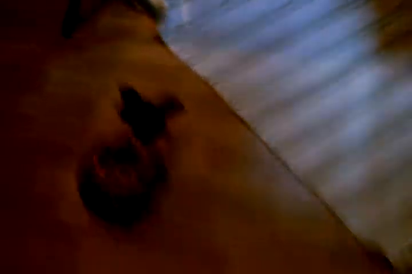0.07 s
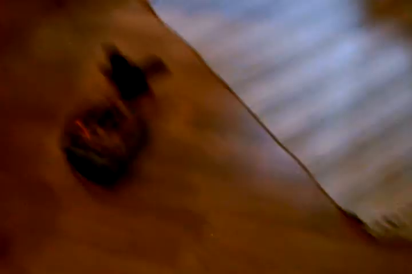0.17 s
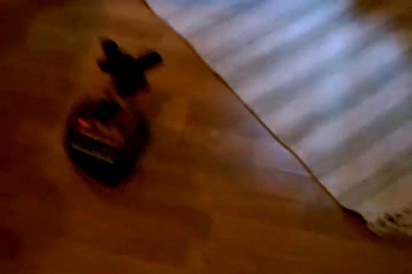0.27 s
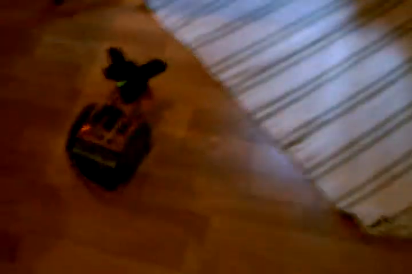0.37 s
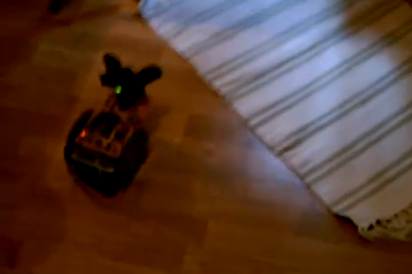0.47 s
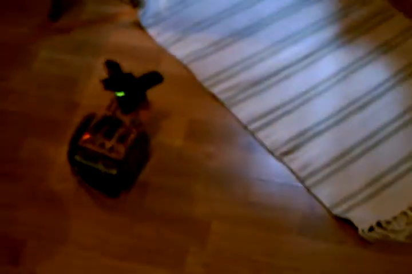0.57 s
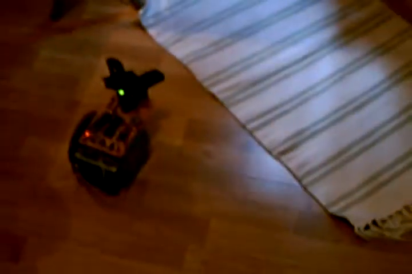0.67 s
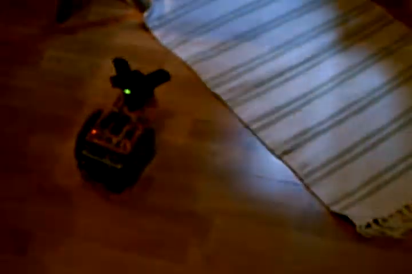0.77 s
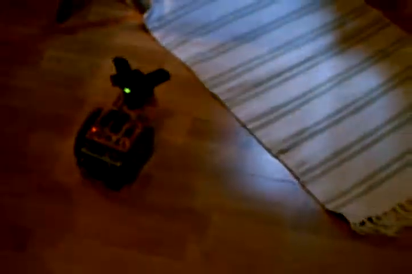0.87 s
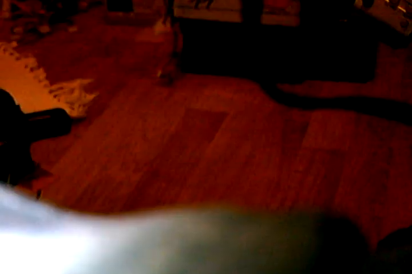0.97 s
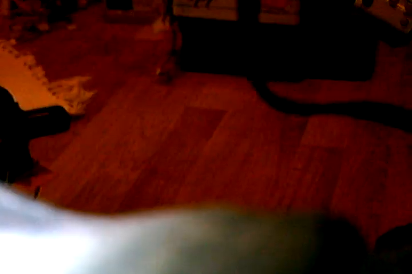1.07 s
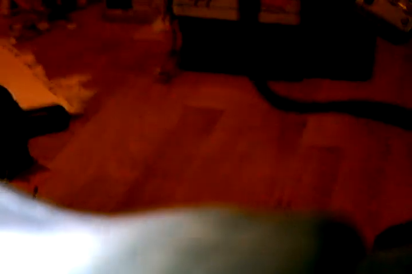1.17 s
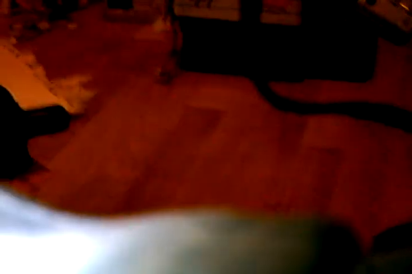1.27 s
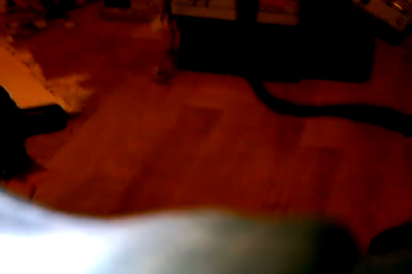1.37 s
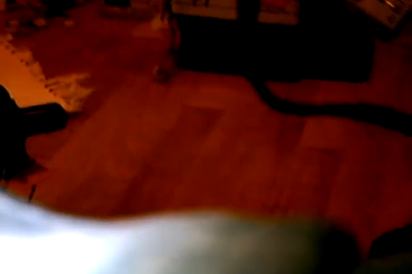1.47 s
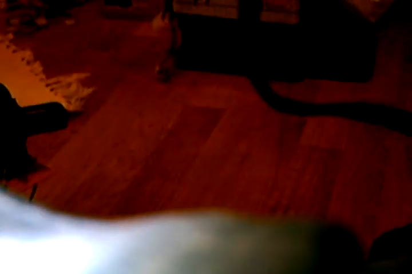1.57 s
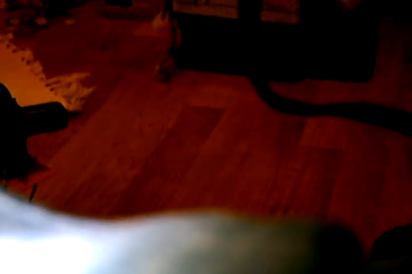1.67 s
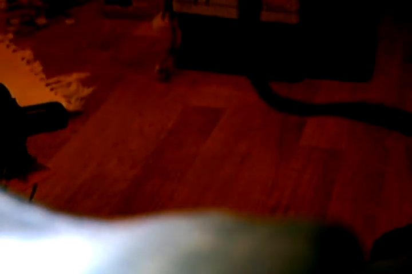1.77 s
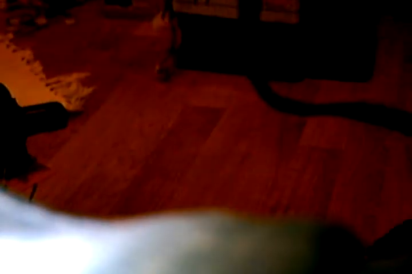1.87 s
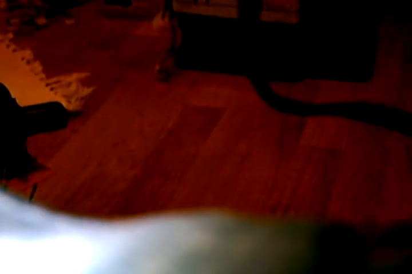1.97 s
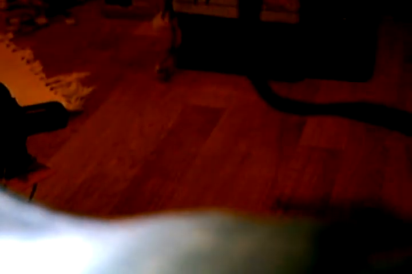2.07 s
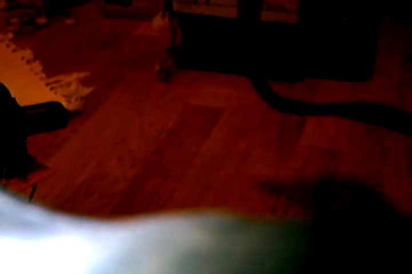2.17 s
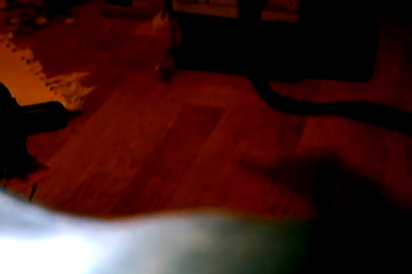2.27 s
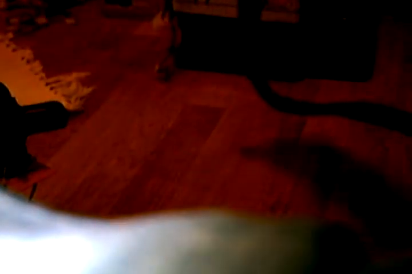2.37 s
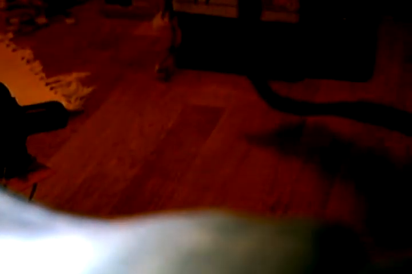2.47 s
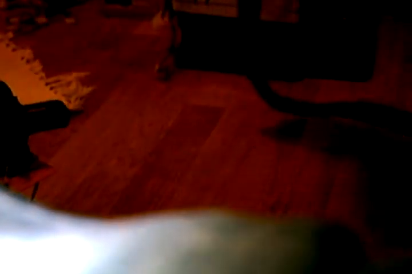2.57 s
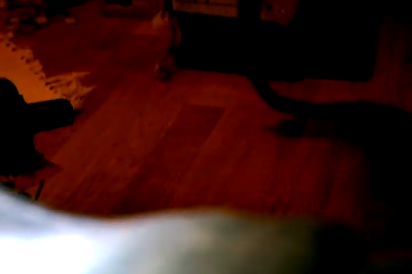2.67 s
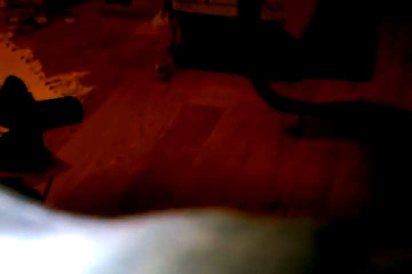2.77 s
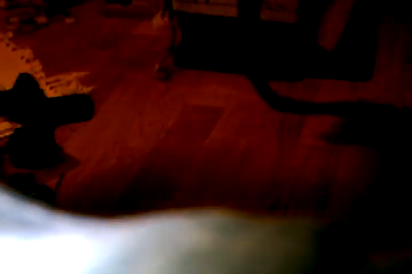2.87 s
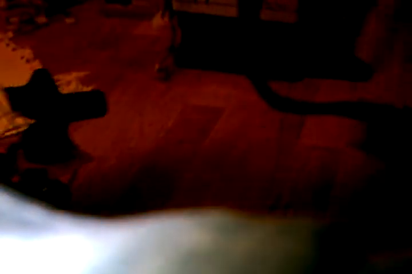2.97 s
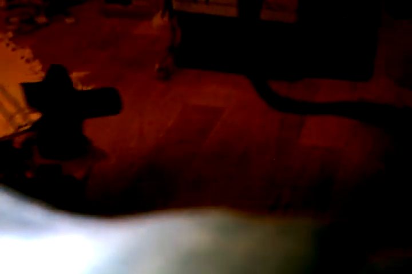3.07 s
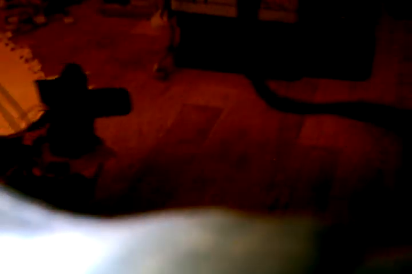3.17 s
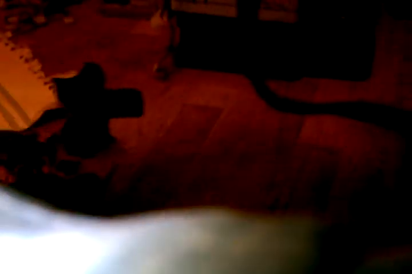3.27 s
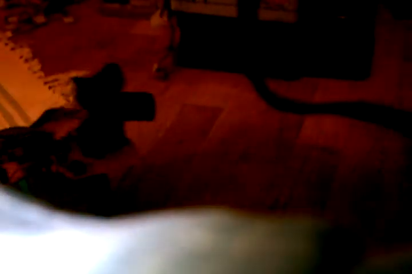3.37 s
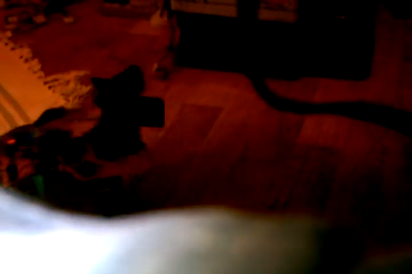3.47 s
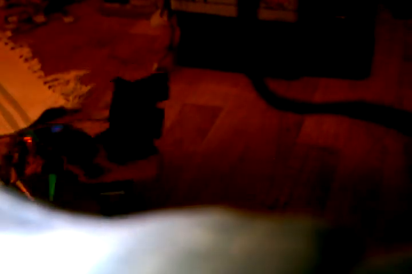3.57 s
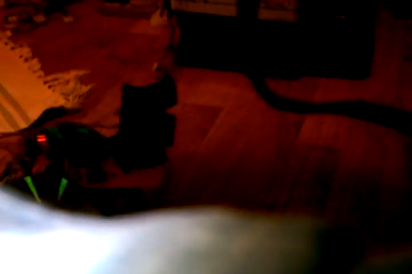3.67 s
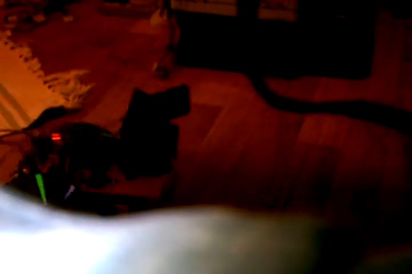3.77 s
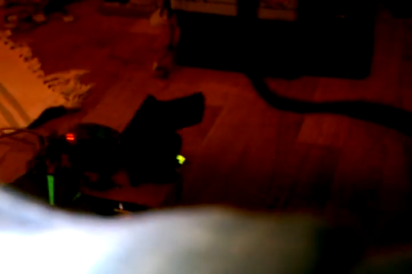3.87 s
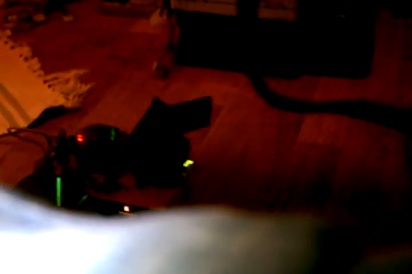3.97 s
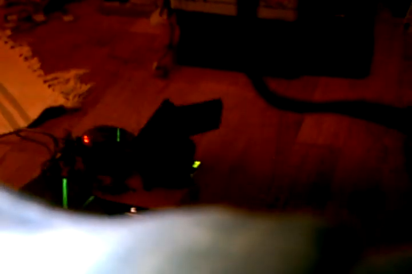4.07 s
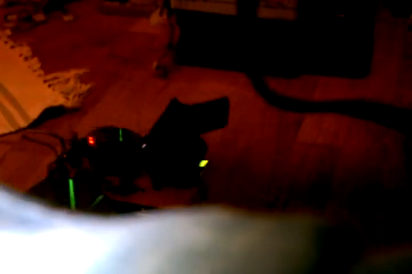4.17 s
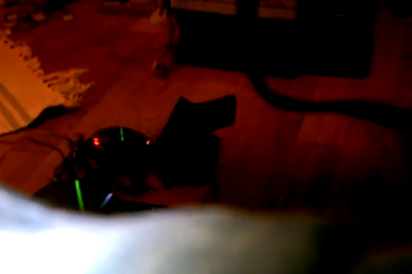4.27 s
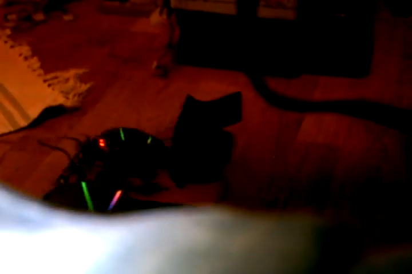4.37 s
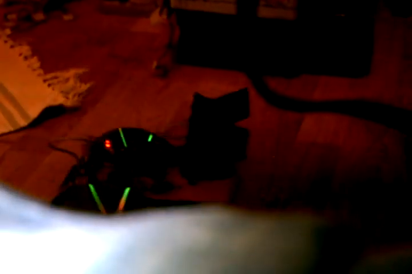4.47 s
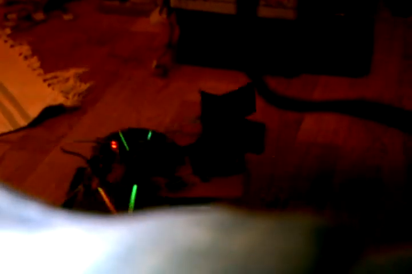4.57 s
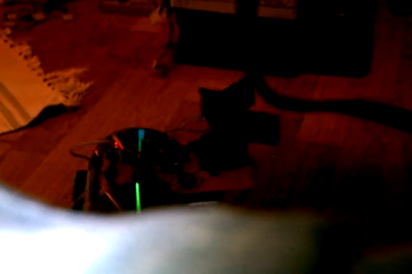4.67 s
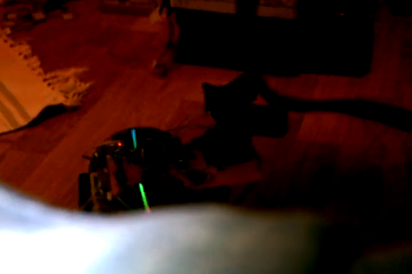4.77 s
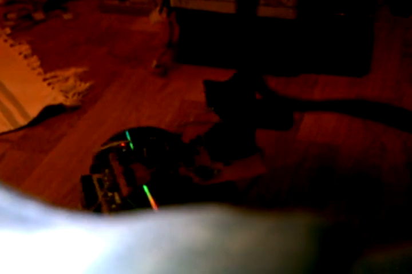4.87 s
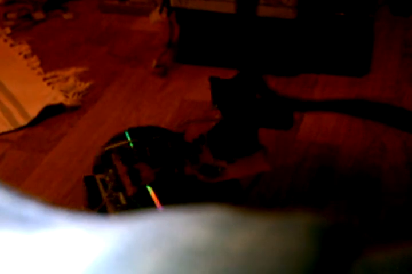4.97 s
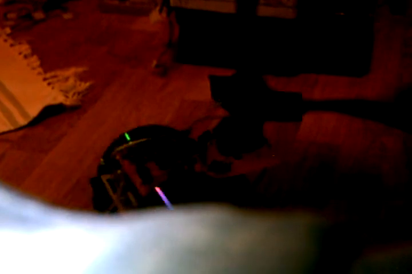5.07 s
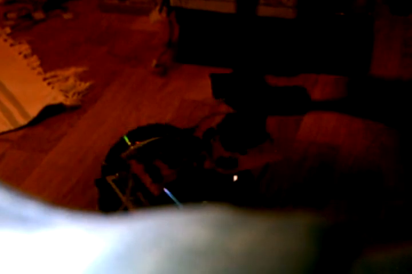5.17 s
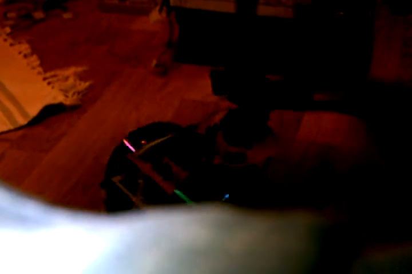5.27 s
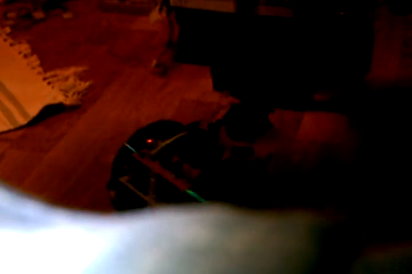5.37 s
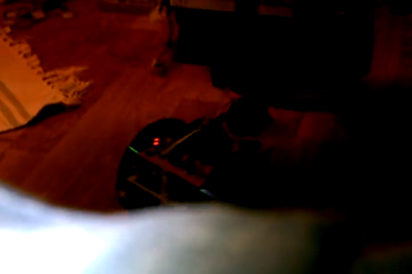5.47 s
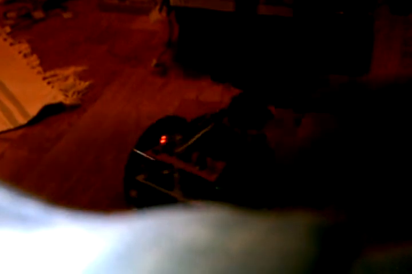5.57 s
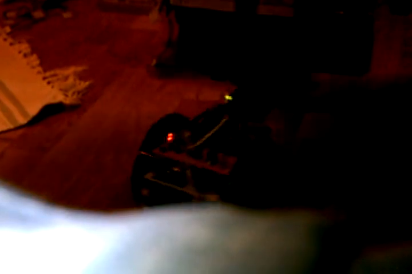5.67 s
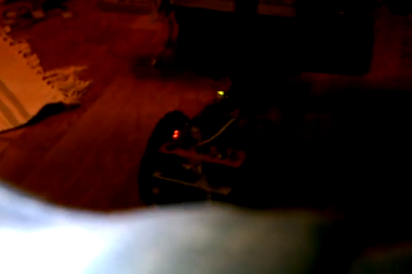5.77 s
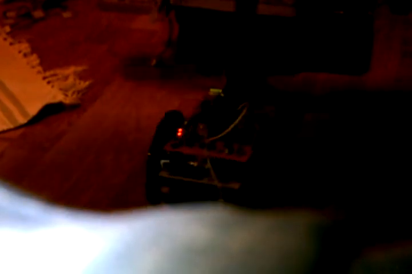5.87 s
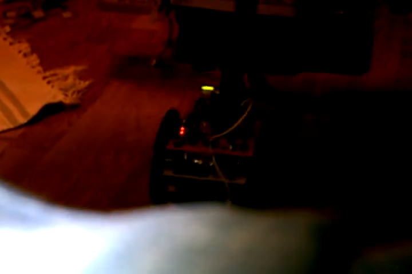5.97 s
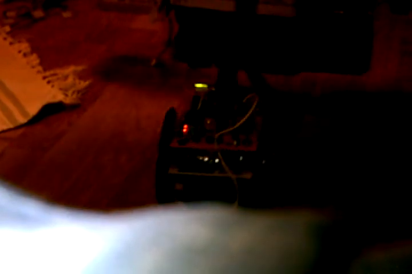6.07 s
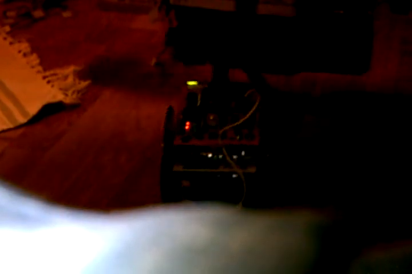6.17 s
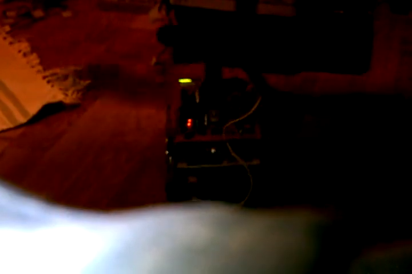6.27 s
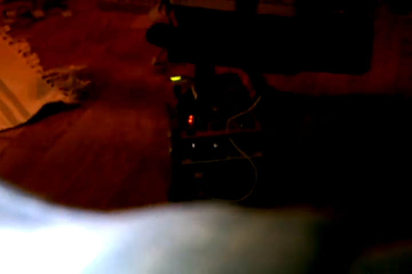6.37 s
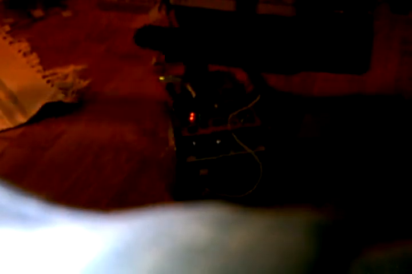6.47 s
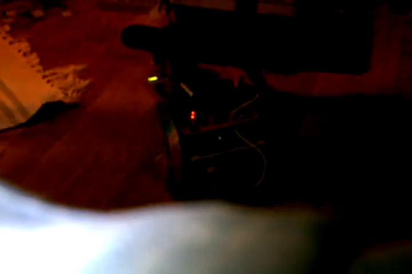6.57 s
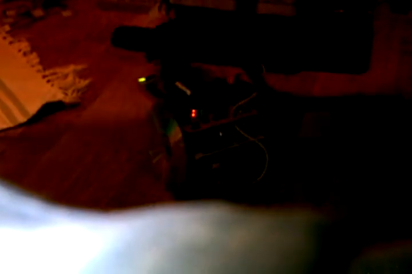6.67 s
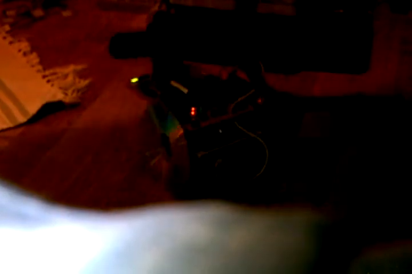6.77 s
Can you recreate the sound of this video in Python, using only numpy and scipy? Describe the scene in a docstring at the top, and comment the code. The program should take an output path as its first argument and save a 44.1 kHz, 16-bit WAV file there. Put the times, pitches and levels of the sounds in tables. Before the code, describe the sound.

A camera is set down with loud knocks, then a small robot's gear motors whirr and rattle with wavering pitch on a wooden floor.

```python
"""Small robot turning on a wooden floor

Gear trains rattle in plastic housings, meshing teeth whine with the motor speed, a tyre squeaks and
the chassis judders. Before it moves, right at the microphone, the camera is handled and set down hard.
One mono microphone with a narrow band picks up all this over room hiss; the hardest blows clip."""
import sys
import numpy as np
from scipy.fft import rfft, irfft, next_fast_len
from scipy.io import wavfile
from scipy.ndimage import map_coordinates

SR = 44100
rng = np.random.default_rng(int(sys.argv[2]) if len(sys.argv) > 2 else 0)


def store_wav(level_fs):
    """Save 16-bit WAV to argv[1]."""
    pcm = np.round(np.clip(np.atleast_2d(level_fs), -1, 1) * 32767)
    wavfile.write(sys.argv[1], SR, pcm.T.astype(np.int16))


N = 300321
TIME = np.arange(N) / SR


def amp(db):
    """Gain from dB."""
    return 10 ** (np.asarray(db) / 20)


def unit(x):
    """x at rms 1."""
    return x / np.sqrt(np.mean(x ** 2) + 1e-20)


def curves(rows):
    """One value per sample for each column, and a gate that is open over the table's span."""
    times, *columns = np.transpose(rows)
    gate = np.clip(np.minimum(TIME - times[0], times[-1] - TIME) / .012 + 1, 0, 1)
    return [np.interp(TIME, times, column) for column in columns] + [gate]


def swell(peak_s, rise, fall, db):
    """Gain of a short swell with its own rise and fall."""
    t = TIME - peak_s
    return amp(db) * np.exp(-(t / np.where(t < 0, rise, fall)) ** 2)


def wobble(rate):
    """A smooth random curve, rate knots a second."""
    return map_coordinates(rng.standard_normal(int(N * rate / SR) + 4), [TIME * rate])


def lumpy(rate, depth_db):
    """Noise whose level changes rate times a second."""
    return rng.standard_normal(N) * amp(depth_db * wobble(rate))


def wavering_phase(hz, waver, rate=120):
    """Phase of a tone whose pitch is unsteady."""
    return 2 * np.pi * np.cumsum(hz * (1 + waver * wobble(rate))) / SR


def band(phase, rate):
    """A tone smeared into a band: its size and phase change rate times a second."""
    return wobble(rate) * np.sin(phase) + wobble(rate) * np.cos(phase)


def filtered(x, response):
    """x through a complex response of frequency."""
    size = next_fast_len(len(x) + 8192)
    return irfft(rfft(x, size) * response(np.fft.rfftfreq(size, 1 / SR)), size)[:len(x)]


def colour(points):
    """Response through (Hz, dB) points on a log axis."""
    knots_hz, db = np.transpose(points)
    return lambda hz: amp(np.interp(np.log(hz + 1), np.log(knots_hz + 1), db))


def resonate(x, modes):
    """x through broad resonances, each (Hz, width Hz, dB)."""
    return filtered(x, lambda f: sum(
        (-1) ** k * amp(db) * 1j * f * width / (hz * hz - f * f + 1j * f * width)
        for k, (hz, width, db) in enumerate(modes)))


# motors under load: (time [s], rattle level [dB], rasp over rattle [dB])
MOTOR_LOAD = [(2.4, -53, 0), (2.53, -50.5, 1.5), (2.6, -44.5, -4), (2.7, -39.5, -11.5), (2.85, -38, -3.5),
              (3.0, -41, -2), (3.4, -38, 0), (3.8, -40, -1), (4.05, -45, 0), (4.45, -41, -9),
              (4.55, -41, -2), (4.82, -39.5, -4.5), (4.99, -41.5, -6.5), (5.045, -45.5, -8),
              (5.09, -42, -8), (5.6, -38.5, -22), (5.85, -37.5, -10), (6.1, -41.5, -22), (6.28, -40.5, -9),
              (6.52, -43, -8), (6.78, -42, 1.5)]
# spectrum of the plastic housings: (frequency [Hz], level [dB])
HOUSING_SPECTRUM = [(18, -46.5), (30, -16.5), (456, -12), (596, -13), (712, -13.5), (2270, -11.5),
                    (4340, -1), (5300, -5.5), (6200, -10.5), (8060, -66.5), (13600, -120)]
# loose gears singing: (frequency [Hz], width [Hz], level [dB])
RASP_BANDS = [(4260, 280, 0), (4560, 330, -3), (5150, 350, -6), (3650, 250, -10)]
# chassis resonances: (frequency [Hz], width [Hz], level [dB])
CHASSIS_MODES = [(636, 194, -3.5), (952, 164, -0.5), (1730, 98, -10.5)]
# wheels slipping on the floor: (time [s], fall [s], level [dB])
WHEEL_SLIPS = [(2.482, 0.023, -46.5), (3.179, 0.039, -47), (3.6, 0.021, -46.5), (4.14, 0.066, -49.5),
               (4.37, 0.026, -49), (4.8, 0.049, -52.5), (5.708, 0.086, -40.5), (5.836, 0.04, -34.5),
               (5.895, 0.02, -47)]


def gears(slip_rise_s=.007):
    """Backlash chatter rings the housings; slips of the wheels shake the chassis."""
    rattle_db, rasp_db, running = curves(MOTOR_LOAD)
    running = np.maximum(running, np.arange(N) > N / 2)  # once started, the motors stay on
    teeth = lumpy(260, depth_db=2) * amp(1.36 * wobble(25))
    rasp = sum(amp(db + 1.9 * wobble(14)) * band(wavering_phase(hz, waver=.022, rate=13), width)
               for hz, width, db in RASP_BANDS)
    chatter = unit(filtered(teeth, colour(HOUSING_SPECTRUM))) + amp(rasp_db) * unit(rasp)
    chassis = resonate(lumpy(140, depth_db=2.5), CHASSIS_MODES)
    judder = unit(resonate(chassis, [(900, 2300, 0)]))
    slips = sum(swell(s, slip_rise_s, fall, db) for s, fall, db in WHEEL_SLIPS)
    shake = slips + running * amp(rattle_db - 17 + 2.1 * wobble(6.9))
    return running * amp(rattle_db) * chatter + shake * judder


# longer motor runs: (2nd harmonic gain [dB], [(time [s], mesh rate [Hz], level [dB])])
MOTOR_RUNS = [ (-4, [(2.73, 1510, -43), (2.77, 1538, -42.5), (2.82, 1470, -51), (2.89, 1533, -38.5),
              (3.02, 1510, -58)]), (-17, [(2.56, 1400, -53), (2.6, 1385, -42.5), (2.74, 1370, -51),
              (2.8, 1450, -40.5), (2.92, 1470, -34.5), (2.96, 1460, -51), (3.03, 1460, -31.5),
              (3.1, 1410, -45.5)]), (-1.5, [(3.52, 1820, -52), (3.55, 1720, -41.5), (3.59, 1640, -46),
              (3.68, 1690, -46.5), (3.75, 1735, -43), (3.79, 1720, -53)]), (-17, [(4.9, 1410, -42),
              (4.99, 1430, -48)]), (-4, [(4.13, 1000, -47), (4.2, 1065, -49.5), (4.27, 1142, -47.5),
              (4.42, 1218, -38), (4.5, 1204, -49)]), (3, [(4.9, 1050, -63), (4.99, 1170, -47)]),
              (6.5, [(5.18, 1290, -47), (5.3, 1300, -46)]), (-6, [(5.32, 1375, -45.5), (5.41, 1408, -40)]),
              (6, [(5.37, 1447, -53), (5.43, 1520, -44.5), (5.49, 1478, -45.5), (5.53, 1575, -46),
              (5.62, 1596, -49.5), (5.64, 1560, -52), (5.66, 1570, -69), (5.68, 1620, -47),
              (5.71, 1590, -46.5)]), (-6, [(5.79, 1430, -39.5), (5.82, 1350, -48), (5.84, 1265, -38),
              (5.865, 1165, -39), (5.905, 1070, -41), (5.93, 1095, -44), (5.95, 1195, -43.5),
              (6.05, 1261, -47), (6.22, 1385, -38.5), (6.31, 1410, -39.5)]), ]
# a wheel grips and slows its motor: (time [s], length [s], mesh from [Hz], to [Hz], level [dB])
MOTOR_SAGS = [(3.079, 0.1, 1790, 1523, -42.5), (3.198, 0.099, 1723, 1630, -46.5),
              (3.294, 0.12, 1872, 1800, -38), (4.592, 0.067, 1276, 1203, -39.5),
              (5.065, 0.07, 1290, 1132, -42.5), (6.403, 0.077, 1354, 1218, -41.5),
              (6.532, 0.1, 1296, 1073, -46.5)]
# how well the gearbox radiates into the room: (frequency [Hz], gain [dB])
GEARBOX_RADIATION = [(2200, -19.5), (2700, -11), (3100, -1.5), (4200, -1.5), (4650, -11), (5100, 3.5),
                     (5700, -14), (7000, -28.5)]


def whines(pinion_teeth=9, eccentricity=.35, sag_second_db=-1.5):
    """Harmonics of the mesh rate; worn teeth smear each one into a rough, wavering band."""
    runs = list(MOTOR_RUNS)
    for s, length, from_hz, to_hz, db in MOTOR_SAGS:
        halfway_hz = from_hz + .59 * (to_hz - from_hz)
        glide = [(s, from_hz, db - 3.5), (s + length / 2, halfway_hz, db), (s + length, to_hz, db - 3)]
        runs.append((sag_second_db, glide))
    out = np.zeros(N)
    for second_db, rows in runs:
        mesh_hz, db, gate = curves(rows)
        phase = wavering_phase(mesh_hz * (1 + .006 * wobble(30)), waver=.009)
        for k, harmonic_db in ((2, second_db), (3, 0), (4, -7)):
            gain = gate * amp(db + harmonic_db + 2.4 * wobble(30))
            gain *= colour(GEARBOX_RADIATION)(k * mesh_hz)
            gain *= 1 + eccentricity * np.cos(phase / pinion_teeth)  # one beat per turn of the shaft
            out += gain * (1.15 * np.sin(k * phase) + 1.1 * band(k * phase, 260))
    return out


# backlash slamming shut: (time [s], level [dB])
CLATTER_BURSTS = [(3.35, -52), (3.925, -38.5), (4.552, -35), (4.646, -42), (4.69, -42), (4.745, -35),
                  (4.808, -32), (4.855, -41), (6.65, -38.5), (6.69, -39.5), (6.779, -32.5)]
# resonances of the clatter: (frequency [Hz], width [Hz], level [dB])
CLATTER_MODES = [(4200, 1300, -2.5), (5570, 610, 2.5)]


def clatter(rise_s=.014, fall_s=.024):
    """Loose teeth collide in bright, gritty bursts."""
    grit = unit(resonate(lumpy(400, depth_db=2.5), CLATTER_MODES))
    return grit * sum(swell(s, rise_s, fall_s, db) for s, db in CLATTER_BURSTS)


# a tyre on the wooden floor: (time [s], rise [s], fall [s], level [dB])
TYRE_SQUEAKS = [(2.53, 0.071, 0.057, -54.5), (2.732, 0.078, 0.034, -34.5), (2.801, 0.015, 0.041, -40.5)]


def squeak(start_hz=600, sink_from_s=2.7, sink_hz_per_s=350):
    """Stick and slip of rubber: a low tone with a weak octave, sinking at its end."""
    hz = start_hz - sink_hz_per_s * np.clip(TIME - sink_from_s, 0, .5)
    phase = wavering_phase(hz, waver=.024)
    gain = sum(swell(*row) for row in TYRE_SQUEAKS) * amp(2.5 * wobble(45))
    return gain * (np.sin(phase) + amp(-18) * np.sin(2 * phase))


def blow(t, t60, modes, contact_s=.0012):
    """A noise burst builds up during contact, dies away and excites the given resonances."""
    envelope = np.minimum(t / contact_s, 1) * amp(-60 * t / max(t60, .002))
    return resonate(envelope * rng.standard_normal(len(t)), modes)


# knocks, the hardest as the camera lands: (time [s], tick level [dB], thud level [dB])
BLOWS = [ (0.347, -37, -55), (0.366, -42, -55), (0.385, -39, -58), (.883, -11, -24), (.8852, -12, 4),
         (.8875, -7, 0), (.8925, -14, -4), (.897, -19, -12), (1.041, -49, -22), (1.214, -46, -26.5),
         (1.259, -30.5, -51), (1.3075, -23, -40), (1.3203, -5, -22), (1.326, -13, -12), (1.535, -32, -48),
         (1.9951, -31, -30), (2.334, -30, -32.5), (5.07, -26, -38), (5.711, -34, -28.5),
         (5.829, -36, -26.5), (5.839, -23, -32), (5.868, -32, -31.5)]
# small plastic parts: (frequency [Hz], width [Hz], level [dB])
TICK_MODES = [(3880, 620, 0)]
# hollow of the camera case, right at the microphone: (frequency [Hz], width [Hz], level [dB])
HOLLOW_MODES = [(2500, 500, -10), (620, 200, -6), (800, 280, -4), (1300, 700, 1)]
# ring of the case and its support: (frequency [Hz], level [dB], t60 [s])
CASE_MODES = [(167, -6, .17), (630, -2, .04), (791, -7, .09), (975, -3, .04), (1250, 0, .05),
              (1660, 0, .11), (2480, -6, .07), (2853, -12, .11), (3650, -18, .08)]


def knocks(tick_t60=.0038, thud_t60=.021, thump_hz=185, thump_t60=.05):
    """Blows strike small parts and the case; harder ones last longer and ring the support."""
    out = np.zeros(N + SR)
    t = np.arange(SR // 4) / SR
    *other_modes, (main_hz, main_width, main_db) = HOLLOW_MODES
    for s, tick_db, thud_db in BLOWS:
        tick = resonate(blow(t, tick_t60, TICK_MODES), TICK_MODES)
        hollow = other_modes + [(main_hz, main_width, main_db + .25 * thud_db)]  # soft blows are duller
        thud = blow(t, thud_t60 * np.exp(.1529 * thud_db), hollow)
        ring = sum(amp(db + 2 * rng.standard_normal() - 60 * t / t60) * np.sin(2 * np.pi * hz * t)
                   for hz, db, t60 in CASE_MODES)
        # the support gives under the blow
        thump = amp(-11 + .3 * thud_db - 60 * t / thump_t60) * np.sin(2 * np.pi * thump_hz * t)
        low = thud / abs(thud).max() + amp(-24.5 + .75 * thud_db) * ring + thump
        out[round(s * SR):][:len(t)] += amp(tick_db) * tick / abs(tick).max() + amp(thud_db) * low
    return out[:N]


# short, close rustles; the one at .88 s is a hissy haze around the loudest knock:
# (time [s], rise [s], fall [s], high level [dB], low level [dB])
RUSTLES = [(.44, 0.051, 0.032, -45.5, -56.5), (.88, 0.022, 0.056, -44, -39), (1.215, 0.044, 0.01, -40, -42),
           (1.32, 0.039, 0.012, -35.5, -39), (1.47, 0.023, 0.04, -72.5, -60), (1.6, 0.061, 0.052, -50, -67),
           (1.785, 0.027, 0.029, -41.5, -52.5), (2.0, 0.0073, 0.093, -43, -59)]


def rustles():
    """Brief swells of grainy noise: a hissy high band and a lower one with the hollow tone of the case."""
    high = unit(resonate(lumpy(320, depth_db=3.5), [(4100, 970, 0)]))
    low = unit(resonate(lumpy(200, depth_db=2.5), HOLLOW_MODES))
    return sum(swell(s, rise, fall, high_db) * high + swell(s, rise, fall, low_db) * low
               for s, rise, fall, high_db, low_db in RUSTLES)


# noise floor of room and preamplifier: (frequency [Hz], level [dB])
HISS_SPECTRUM = [(12, -30.5), (20, 1.5), (91, -2.5), (402, 0), (768, -3.5), (1240, -5), (1430, -6.5),
                 (3020, -6), (4430, -2), (5240, -6), (6200, -17), (8060, -64.5), (13600, -120)]
# faint steady tones: (frequency [Hz], level [dB])
HUM_TONES = [(617, -68), (1240, -66), (3245, -61)]


def background(hiss_db=-51):
    """Room tone of hiss and hum, and the bump of air and hand as the camera comes down."""
    hiss = amp(hiss_db) * unit(filtered(lumpy(8, depth_db=.4), colour(HISS_SPECTRUM)))
    hum = sum(amp(db + wobble(4.5)) * np.sin(2 * np.pi * hz * TIME) for hz, db in HUM_TONES)
    rumble = unit(resonate(rng.standard_normal(N), [(40, 40, 0)]))
    bump = swell(.92, rise=.14, fall=.4, db=-54.5) * rumble
    return hiss + hum + bump


def scene():
    """Robot, rustles, knocks and room all reach one microphone."""
    mono = gears() + clatter() + whines() + squeak() + rustles() + knocks() + background()
    return np.array([mono, mono])


def record(dry, rolloff_hz=5630, edge_hz=6160, ceiling=.7, top_hz=16000):
    """The microphone's band ends steeply; the converter clips loud blows, which adds treble."""
    mic = filtered(dry[0], lambda hz: 1 / (1 + (hz / rolloff_hz) ** 24) / (1 + (hz / edge_hz) ** 120))
    clipped = mic / (1 + abs(mic / ceiling) ** 16) ** (1 / 16)
    mono = filtered(clipped, lambda hz: 1 / (1 + (hz / top_hz) ** 200))
    return np.array([mono, mono])


dry = scene()
out = record(dry)
store_wav(out)
```